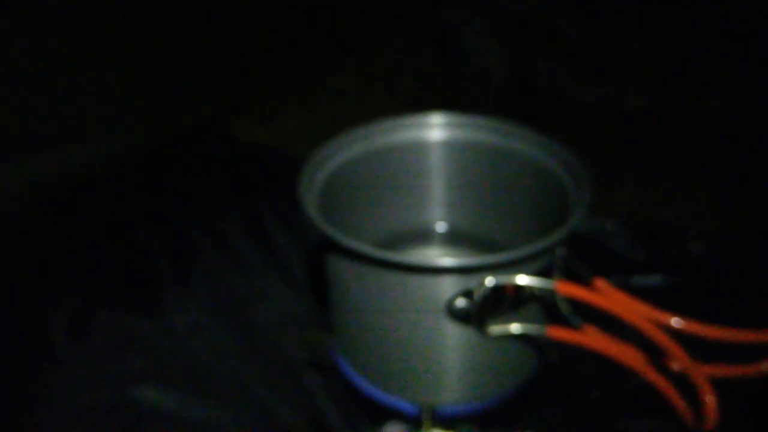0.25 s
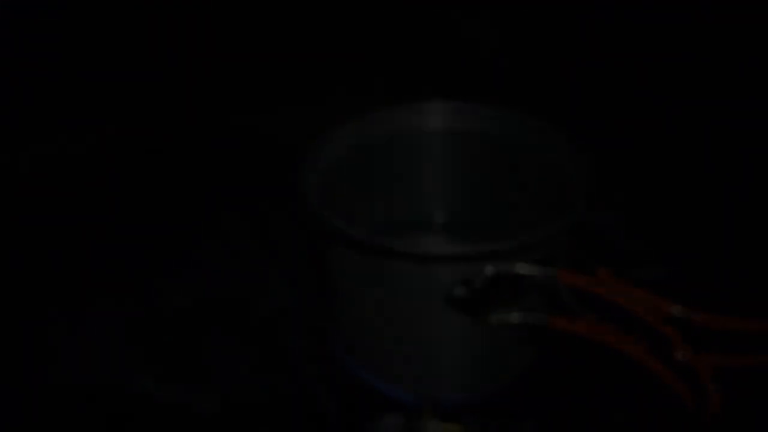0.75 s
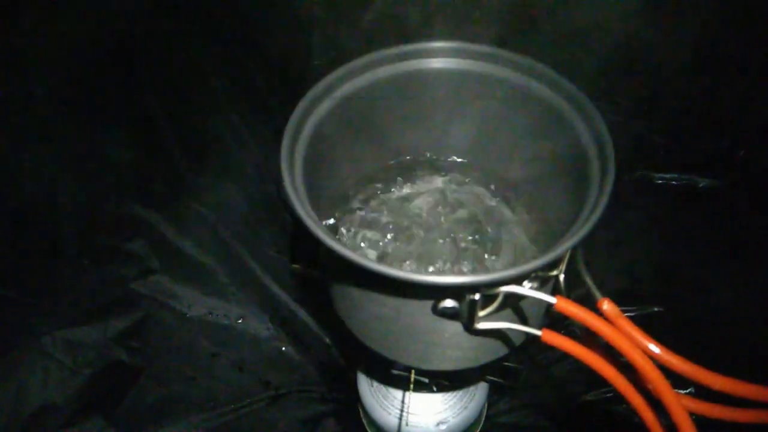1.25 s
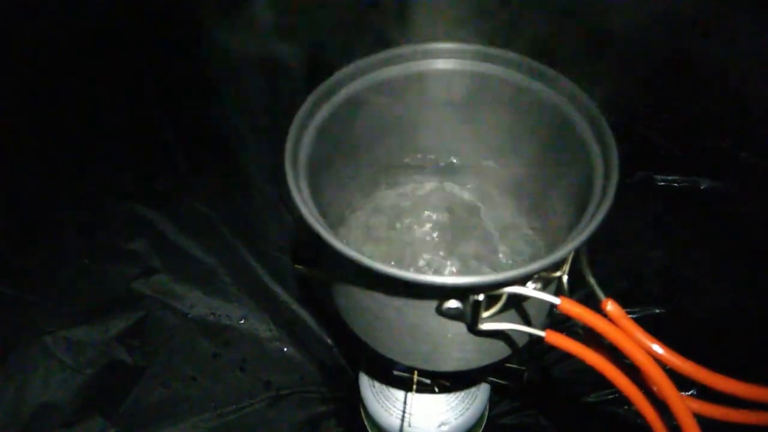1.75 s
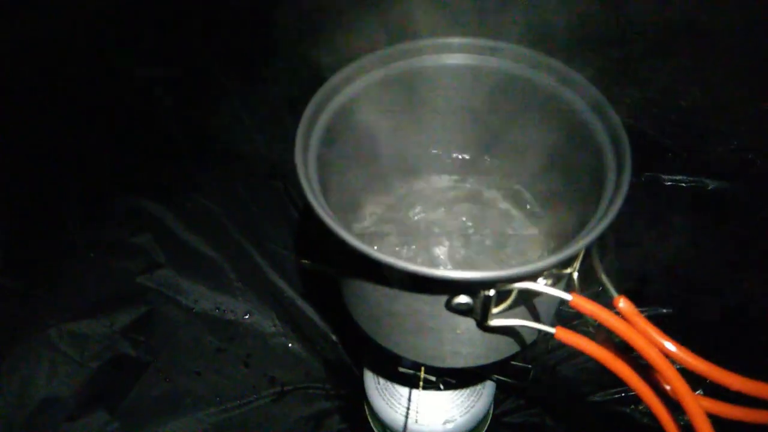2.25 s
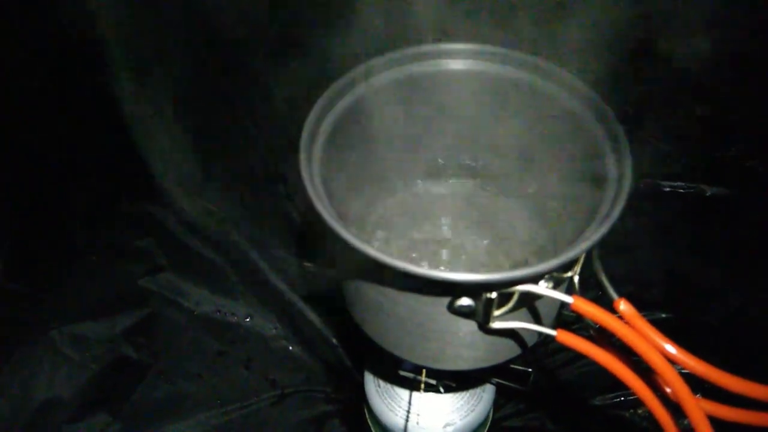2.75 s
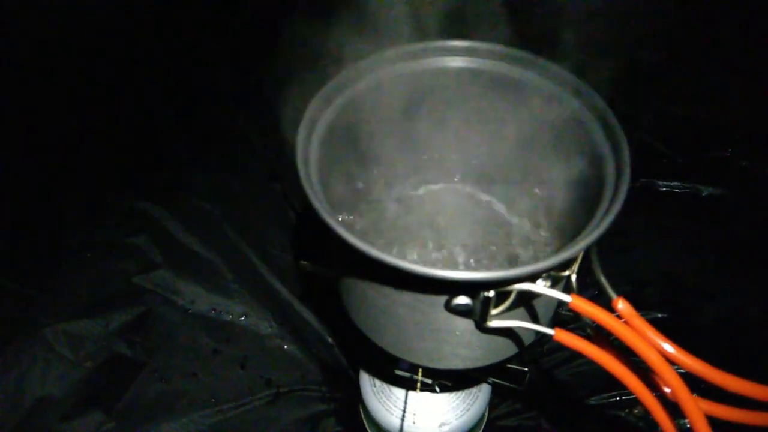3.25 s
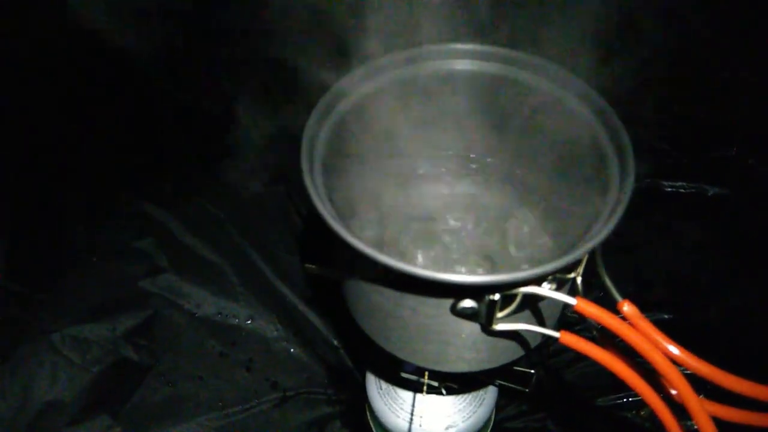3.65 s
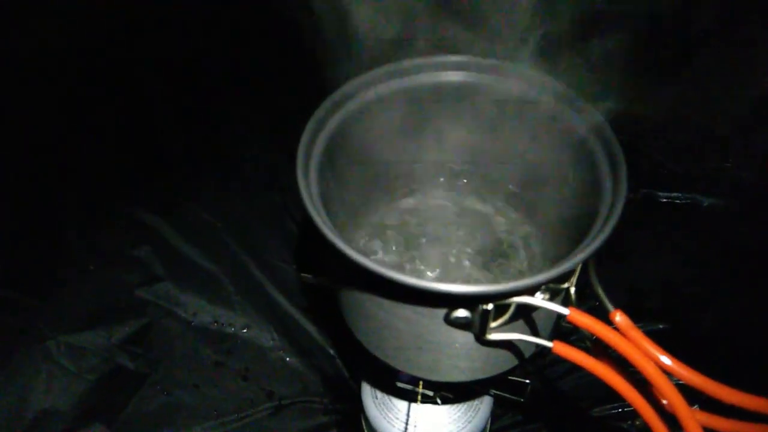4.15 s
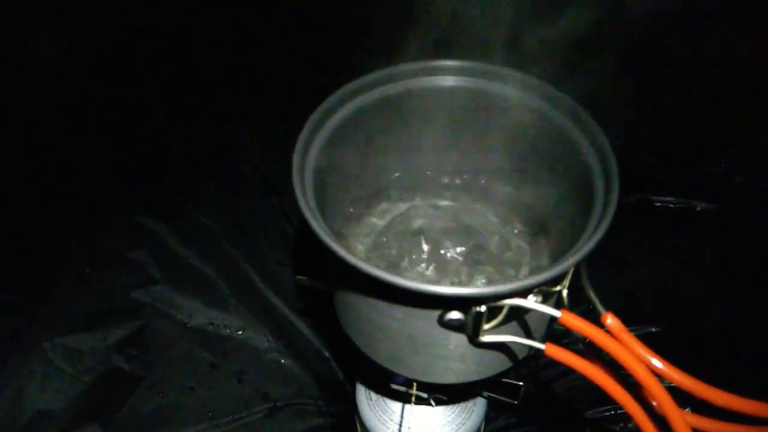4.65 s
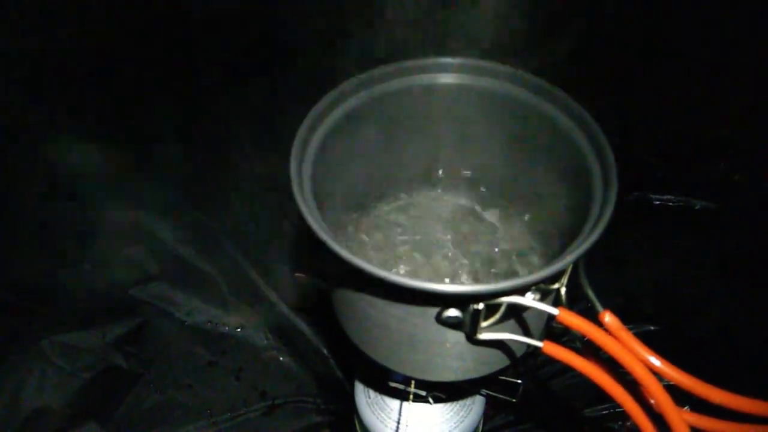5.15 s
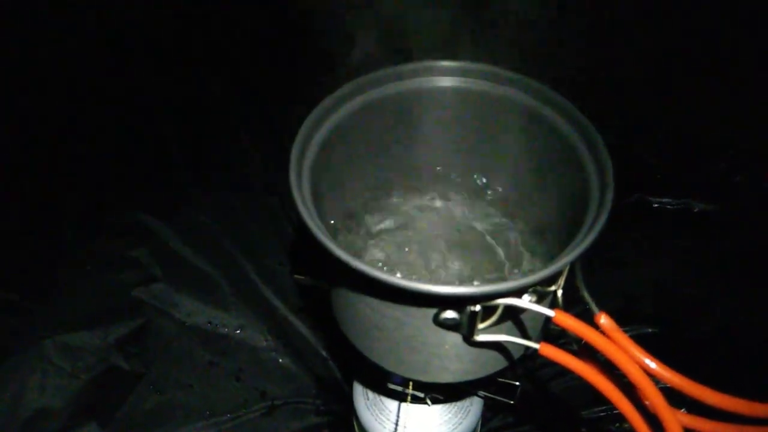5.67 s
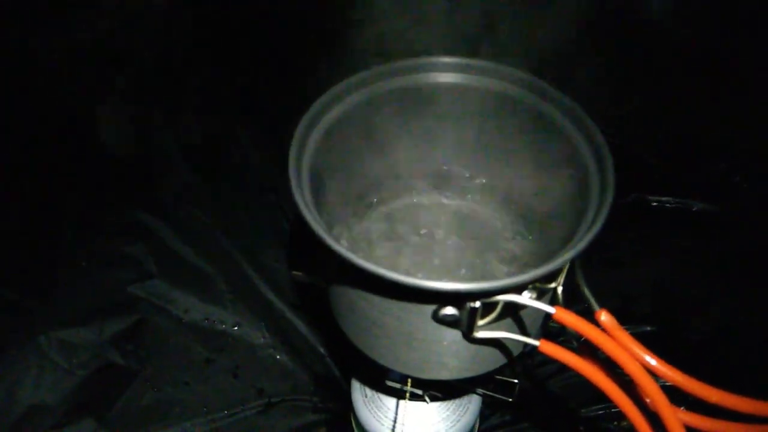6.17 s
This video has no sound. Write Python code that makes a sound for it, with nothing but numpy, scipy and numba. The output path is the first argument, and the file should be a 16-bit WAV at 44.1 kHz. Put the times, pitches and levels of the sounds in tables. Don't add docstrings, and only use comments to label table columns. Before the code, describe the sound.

Close stereo pickup of a small metal pot on a gas stove. A soft, fluttering burner roar lasts under a second, cuts abruptly to silence, then a faint thump on the left leads into a quick fade-in of rolling boil: steady hiss, dense fizz, low hollow glugs, sharp pops toward the right and tiny metallic ticks, continuing to the end.

```python
import sys
import numpy as np
from scipy import signal
from scipy.fft import rfft, irfft
from scipy.io import wavfile
from scipy.ndimage import uniform_filter1d, minimum_filter1d
from numba import njit

SR = 44100
rng = np.random.default_rng(int(sys.argv[2]) if len(sys.argv) > 2 else 0)


def field_ratio(decibels):
    return 10 ** (np.asarray(decibels, dtype=float) / 20)


def dump(signal):
    limited = np.clip(np.atleast_2d(signal).T, -1, 1)
    pcm = np.round(limited * 32767).astype(np.int16)
    wavfile.write(sys.argv[1], SR, pcm)


N = 282681

# hz, level_db_per_hz
BOIL_LEFT = [(30, -102.9), (117, -91.5), (307, -93.5), (718, -86), (851, -92.5), (953, -84), (1265, -97.5),
             (3300, -98.5), (3650, -94), (6600, -92.5), (9350, -96.5), (9950, -90.5), (13150, -87.5),
             (15550, -81.5)]
BOIL_RIGHT = [(30, -98), (307, -89), (953, -89), (1265, -93), (1900, -92.5), (3650, -81.5), (4200, -90.5),
              (5500, -82), (5850, -83.5), (6150, -77), (7050, -88), (10050, -88), (12550, -91),
              (15550, -81.5)]
# hz, width_hz, gain_db
BOIL_LEFT_MODES = [(193, 30, 2.1), (513, 62, -3.0), (1304, 91, -4.0), (1590, 111, 3.2), (2400, 168, 2.7),
                   (3180, 127, -3.5), (3750, 150, 2.6), (4590, 184, -5.8), (5010, 351, 2.6),
                   (5820, 233, -8.5), (6450, 452, 3.0), (7350, 110, 3.1), (7740, 194, -6.4),
                   (9660, 145, -2.4), (15630, 234, -2.5)]
BOIL_RIGHT_MODES = [(159, 16, 0), (279, 23, -19.5), (522, 63, -9.5), (6990, 100, -17), (7800, 140, 3),
                    (8400, 150, 0.5), (8900, 210, 4.5), (9670, 220, -2), (10050, 160, 8.5),
                    (10620, 230, -1.5), (12540, 190, 3), (13150, 190, -22), (13900, 180, -4),
                    (14500, 364, 2), (15600, 390, -9)]
# hz, width_hz, gain_db
WALL_MODES = [(282, 68, -5.5), (970, 30, 5), (3603, 220, 3.5), (3600, 170, 0.5), (6100, 30, 6),
              (6810, 80, 6)]
# hz, likeness_0_to_1
BOIL_ALIKE = [(40, 0.36), (130, 0.86), (640, 0.83), (1000, 0.88), (1400, 0.5), (2500, 0.15), (15000, 0.067)]
# time_s, level_db
BOIL_VIGOUR = [(1.13, 0.5), (1.22, 1), (1.78, .5), (2.26, 0), (3.6, 1), (3.7, 3), (3.76, 4), (3.84, 3),
               (3.92, 2), (4.42, 1), (4.73, 1.5), (4.94, 3), (5.17, 0), (5.91, 1), (6.01, 0.5),
               (6.41, -0.5)]
# start_s, peak_db, pitch_hz, decay_cycles
GLUGS = [(1.1133, -38, 1900, 0.48), (1.113, -17, 1100, 0.53), (1.1159, -41, 830, 1.2),
         (1.6152, -39, 690, 1.7), (1.7501, -33, 790, 1.2), (1.936, -33, 940, 1.7),
         (2.3252, -33.5, 890, 0.91), (2.4374, -32.5, 600, 0.82), (2.5517, -30, 1040, 0.69),
         (2.6419, -26, 1200, 0.72), (3.0868, -29, 740, 1.3), (3.7362, -23, 960, 1.1),
         (4.0194, -22, 950, 2.7), (4.1293, -31, 1030, 1.1), (4.1531, -34.5, 970, 2.9),
         (4.1881, -29.5, 970, 0.75), (4.2894, -29, 1510, 0.74), (4.7947, -28, 885, 1.6),
         (4.7977, -31, 940, 0.89), (4.8178, -29, 1040, 0.9), (4.8466, -30, 664, 1.9),
         (5.042, -32.5, 604, 0.98), (5.3695, -35.5, 920, 2.2), (5.5053, -34.5, 1090, 0.81),
         (5.5785, -35, 1030, 2.3), (5.8214, -45, 1700, 0.8), (5.8321, -39, 1700, 0.91),
         (5.892, -41, 736, 1.7), (6.1377, -27, 670, 0.81), (6.139, -35, 970, 1.6)]
# start_s, peak_db, pitch_hz
BLIPS = [(1.212, -43, 700), (1.5599, -36.5, 900), (1.906, -38, 1060), (2.7202, -39.5, 1070),
         (2.906, -44, 970), (3.069, -41, 1560), (3.0872, -46, 1090), (3.121, -46, 921), (3.2356, -42, 1230),
         (3.298, -41, 684), (3.693, -40, 930), (3.7092, -38, 1330), (3.765, -51, 1000), (4.362, -40, 1040),
         (4.515, -42, 970), (4.698, -40, 625), (4.765, -41, 1040), (4.9917, -39, 1080), (5.11, -41, 980),
         (5.14, -38, 960), (5.2825, -37.5, 920), (5.395, -40, 920), (5.8889, -44, 657), (6.009, -42.5, 660),
         (6.05, -43, 730), (6.111, -40, 885), (6.125, -39, 800), (6.15, -40, 750), (6.205, -44, 660)]
# start_s, peak_db, pitch_hz
MURMURS = [(1.013, -50, 1090), (1.08, -48, 620), (1.288, -43, 960), (1.414, -52, 767), (1.438, -53, 770),
           (1.466, -48, 665), (1.544, -44, 980), (1.599, -44, 912), (1.664, -48, 1060), (1.735, -46, 980),
           (1.775, -45, 953), (1.868, -48, 961), (1.928, -45, 890), (2.085, -49.5, 673), (2.207, -51, 738),
           (2.282, -53, 915), (2.303, -51, 991), (2.491, -44, 950), (2.53, -44, 720), (2.702, -45, 697),
           (2.863, -46, 961), (2.916, -47, 991), (3.048, -48, 921), (3.284, -50, 684), (3.324, -45, 921),
           (3.376, -48, 680), (3.444, -48, 657), (3.51, -50, 980), (3.628, -45.5, 710), (3.749, -45, 1140),
           (3.769, -52, 775), (3.928, -59, 727), (3.963, -47, 907), (3.991, -48, 1060), (4.334, -52, 918),
           (4.459, -43, 958), (4.581, -51, 690), (4.611, -50, 633), (4.625, -47, 990), (4.899, -44, 990),
           (4.923, -45, 875), (5.465, -47, 988), (5.536, -56, 883), (5.819, -46, 950), (5.831, -46, 920),
           (5.934, -44.5, 930), (5.961, -52, 807), (6.279, -47.5, 666), (6.324, -50, 620)]
# start_s, peak_db, pitch_hz, decay_cycles
POPS = [(0.993, -26, 3750, 0.56), (1.3344, -25, 2270, 0.65), (1.5037, -26, 2940, 0.8),
        (1.6536, -30.5, 2700, 3), (1.8533, -33, 2730, 1.8), (1.9302, -18, 3400, 1.26),
        (2.4515, -22.5, 2900, 0.84), (2.5384, -15.5, 3070, 0.62), (2.865, -27, 2620, 1.3),
        (2.967, -24, 2390, 0.93), (3.385, -22, 2520, 0.74), (3.4204, -22, 3270, 1.4),
        (3.5677, -26.5, 3450, 1.5), (3.7352, -34, 2860, 4.5), (3.892, -32, 2820, 3.6),
        (4.026, -19, 2750, 0.52), (4.0398, -20, 3100, 1.7), (4.1505, -24.5, 2750, 3.2),
        (4.152, -29, 3000, 1.7), (4.153, -23, 3370, 5.7), (4.52, -31, 2430, 2), (4.644, -21, 2780, 1.9),
        (4.7217, -27, 2860, 1.9), (4.738, -28.5, 2190, 1.4), (4.9014, -13.5, 3000, 0.49),
        (4.9512, -21.5, 2550, 0.72), (5.5054, -26, 2630, 0.8), (5.5377, -27, 2640, 1.7),
        (5.832, -16, 3600, 0.66), (6.3246, -24, 3060, 2.1)]
# start_s, peak_db, pitch_hz
DROPS = [(1.0663, -15, 7020), (1.0946, -30, 5370), (1.2092, -16, 6200), (1.334, -11.5, 5800),
         (1.5408, -15, 4940), (1.6654, -10.5, 6100), (1.667, -21.5, 3270), (1.7178, -30, 6100),
         (1.8527, -13, 5560), (1.8785, -26, 5440), (1.906, -11.5, 5900), (2.178, -19, 5400),
         (2.2057, -8, 12500), (2.2056, -18, 9300), (2.361, -22, 8400), (2.4725, -13, 6200),
         (2.506, -16, 7680), (2.9139, -14.5, 8400), (4.3808, -11.5, 8400), (4.904, -16, 6100),
         (5.157, -18, 7680), (5.2536, -32, 2420), (5.4182, -14.5, 8400), (5.7925, -20, 6100),
         (5.8487, -16, 3600), (5.925, -16.5, 3300), (5.9097, -16, 6100), (5.9165, -20, 5000)]
# start_s, peak_db
TICKS = [(1.0655, -44), (1.277, -35), (1.3535, -36), (1.4726, -45), (1.5395, -42), (1.5778, -40),
         (2.177, -43), (2.24, -46), (2.4294, -45), (2.6633, -35), (2.722, -45), (3.049, -45), (3.0679, -48),
         (3.1093, -43), (3.2211, -32), (3.4344, -48), (3.5114, -43), (3.5603, -38), (3.62, -46),
         (3.6666, -43), (3.6825, -35), (3.7584, -42), (3.8164, -40), (3.916, -41), (4.0063, -43),
         (4.0901, -35), (4.3323, -40), (4.3535, -44), (4.4373, -38), (4.581, -48), (4.6828, -31),
         (4.8419, -43), (5.0409, -47), (5.1223, -31), (5.2724, -43), (5.3363, -44), (5.461, -41),
         (5.5732, -43), (5.668, -49), (5.7583, -36), (5.8027, -34), (6.0317, -45), (6.106, -45),
         (6.172, -34), (6.2412, -42)]
# hz, level_db_per_hz
FLAME_LEFT = [(30, -99.5), (139, -75), (290, -84.5), (456, -74), (572, -81.5), (606, -101.5), (760, -78.5),
              (1009, -88), (1130, -101.5), (2050, -86), (3350, -99.1), (3700, -86.4), (4500, -97.5),
              (15550, -93.5)]
FLAME_RIGHT = [(30, -94), (164, -78.5), (274, -86.5), (385, -75), (511, -72), (678, -88), (1550, -89.5),
               (1750, -81), (3200, -93.5), (3850, -84), (4500, -93.5), (8750, -101.9), (9700, -96.5),
               (15550, -97)]
# hz, width_hz, gain_db
FLAME_LEFT_MODES = [(1134, 45, -1), (1580, 110, 7), (1770, 100, -8.5), (1910, 54, 6.5), (2440, 200, -18),
                    (2740, 60, 11), (3000, 76, 1), (3210, 80, 3), (4100, 81, 3), (4410, 176, 0.5),
                    (5300, 79, -13), (5480, 74, 11), (6780, 102, 3), (7200, 460, 6), (8200, 200, -6),
                    (5900, 130, -5), (9600, 1105, -4), (9900, 254, -7), (10900, 150, 8.5), (12500, 189, -4),
                    (15400, 234, 6)]
FLAME_RIGHT_MODES = [(745, 52, -1), (970, 135, 8.5), (1220, 50, -3.5), (1510, 27, -15), (2285, 67, 7),
                     (2590, 62, -4), (2860, 58, -6), (3060, 58, 6.5), (3140, 80, -15), (3400, 86, 8.5),
                     (5160, 140, -3.5), (5450, 84, 3), (7240, 107, 3), (7390, 130, -9), (7950, 130, 6),
                     (8440, 125, -6), (9800, 148, 3), (9900, 153, 5.5), (10600, 165, -1), (11640, 890, -5),
                     (13300, 400, 4)]
# hz, likeness_0_to_1
FLAME_ALIKE = [(60, 0.97), (300, 1), (700, 0.97), (1400, 0.35), (3500, 0.7), (7000, 0), (15000, 0)]
# time_s, level_db
FLAME_FLUTTER = [
    (0.0, -52.5),
    (0.36, -52),
    (0.384, -53),
    (0.408, -53),
    (0.564, -53.5),
    (0.604, -51),
    (0.642, -53.5),
    (0.76, -51.5),
]

FLAME_STOP_S, BOIL_START_S, BOIL_FULL_S = 0.767, 0.8945, 0.99
BURST_LAG_S = 0.001


def colour(points, modes):
    hz = np.arange(4097) * SR / 8192 + 1
    points_hz, points_db = np.transpose(points)
    db = np.interp(np.log(hz), np.log(points_hz), points_db)
    for mode_hz, width_hz, gain_db in modes:
        db = db + gain_db / (1 + (2 * (hz - mode_hz) / width_hz) ** 2)
    cepstrum = irfft(np.log(field_ratio(db) * np.sqrt(SR / 2)))
    cepstrum[1:4096] *= 2
    cepstrum[4097:] = 0
    return irfft(np.exp(rfft(cepstrum)))[:4096]


def through(x, response):
    return signal.fftconvolve(x, response)[:N]


def curve(table):
    time_s, level_db = np.transpose(table)
    return field_ratio(np.interp(np.arange(N) / SR, time_s, level_db - level_db.mean()))


def walk(rate_hz):
    hold = int(SR / rate_hz)
    steps = np.repeat(rng.standard_normal(N // 200), hold)[:N]
    return 1.3 * uniform_filter1d(uniform_filter1d(steps, hold), hold)


@njit
def grains(at, hz, cycles, size, glide):
    out = np.zeros(N)
    for k in range(len(at)):
        step = 2 * np.pi * hz[k] / SR
        fall = np.exp(-hz[k] / SR / cycles[k])
        phase, env, rise = 0., size[k], 1.
        i = at[k]
        while abs(env) > abs(size[k]) * .003 and i < N:
            out[i] += env * (1 - rise) * np.sin(phase)
            phase += step
            step *= 1 + glide * hz[k] / SR
            env *= fall
            rise *= np.exp(-3 * hz[k] / SR)
            i += 1
    return out


def turbulence(alike, shared_db, own_db, own_rate_hz, trend):
    hz = np.arange(N // 2 + 1) * SR / N + 1
    alike_hz, likeness = np.transpose(alike)
    share = np.clip(np.interp(np.log(hz), np.log(alike_hz), likeness), 0, 1)
    mid, side = rfft(rng.standard_normal((2, N)))
    sign = np.array([[1], [-1]])
    pair = (np.sqrt(1 + share) * mid + sign * np.sqrt(1 - share) * side) / np.sqrt(2)
    shared = shared_db * walk(110)
    out = 0
    for octave in np.arange(5, 14.6, .5):
        band = np.clip(1 - 2 * abs(np.log2(hz) - octave), 0, 1)
        gain = trend(2 ** octave) * field_ratio(shared + own_db * walk(own_rate_hz))
        out = out + gain * irfft(pair * band, N)
    return out


def fizz(low_hz, high_hz, spread_db, cycles, count):
    when, pitch, strength = rng.random((count, 3)).T
    hz = low_hz * (high_hz / low_hz) ** pitch
    size = hz * field_ratio(-spread_db * np.log(.02 + .98 * strength))
    out = grains((when * N).astype(int), hz, np.full(count, 1. * cycles), size, 0.062)
    return out / out.std()


def boil():
    vigour = curve(BOIL_VIGOUR)
    churn, spray = vigour ** 0.88, vigour ** 0.25

    def trend(hz):
        if hz < 2200:
            return churn
        return spray if hz < 8500 else 1

    hiss = field_ratio(-1.0) * turbulence(BOIL_ALIKE, shared_db=0.88, own_db=0.8, own_rate_hz=45, trend=trend)
    surge = field_ratio(2.0 * walk(60))
    large = field_ratio(-14.0) * churn * fizz(449, 1870, spread_db=1.3, cycles=2.06, count=1500)
    small_left = field_ratio(-9.0) * spray * fizz(1200, 9040, spread_db=0.51, cycles=5.0, count=6000)
    small_right = field_ratio(-8.5) * spray * fizz(1577, 5960, spread_db=3.0, cycles=1.6, count=6000)
    left = hiss[0] + surge * (large + small_left)
    right = hiss[1] + surge * (large + small_right)
    return np.array([through(left, colour(BOIL_LEFT, BOIL_LEFT_MODES)),
                     through(right, colour(BOIL_RIGHT, BOIL_RIGHT_MODES + WALL_MODES))])


def bursts(table, left_db, right_db, tail_db, tail_s, cut_hz):
    start_s, peak_db, hz, cycles = np.transpose(table)
    direct = grains((start_s * SR).astype(int), hz, np.clip(cycles, .4, 9), -field_ratio(peak_db), 0.)
    direct = signal.sosfilt(signal.butter(2, cut_hz, "high", fs=SR, output="sos"), direct)
    direct = signal.lfilter(*signal.butter(1, 9000, fs=SR), direct)
    t = np.arange(2048) / SR
    decay = np.exp(-t / tail_s) * (t > .0006) / np.sqrt(tail_s * SR)
    walls = field_ratio(tail_db) * rng.standard_normal((2, len(t))) * decay
    walls[:, 0] = 1
    return np.array([field_ratio(left_db) * through(direct, walls[0]), field_ratio(right_db) * through(direct, walls[1])])


def glugs():
    blip_cycles = 2.3
    rows = [tuple(row) for row in GLUGS]
    rows += [(s, db, hz, blip_cycles) for s, db, hz in BLIPS]
    rows += [(s + BURST_LAG_S, db + 3.5, hz, blip_cycles) for s, db, hz in MURMURS]
    return bursts(rows, left_db=-1.0, right_db=-1.0, tail_db=-5, tail_s=0.0079, cut_hz=390)


def pops():
    drop_db, drop_cycles = -9, 1.2
    rows = [tuple(row) for row in POPS]
    rows += [(s, db + drop_db, hz, drop_cycles) for s, db, hz in DROPS]
    return bursts(rows, left_db=-15, right_db=1.0, tail_db=3, tail_s=0.004, cut_hz=1900)


def cracks():
    pop_db, drop_db, tick_db = -16.5, -14, 8
    rows = [(s, db + pop_db) for s, db, *_ in POPS]
    rows += [(s, db + drop_db) for s, db, _ in DROPS]
    rows += [(s + BURST_LAG_S, db + tick_db) for s, db in TICKS]
    start_s, peak_db = np.transpose(rows)
    knock = -np.bincount((start_s * SR).astype(int), field_ratio(peak_db), N)
    wall = np.array([field_ratio(-11.5) * colour(BOIL_LEFT, BOIL_LEFT_MODES),
                     colour(BOIL_RIGHT, BOIL_RIGHT_MODES + WALL_MODES)])
    wall = signal.sosfilt(signal.butter(2, 7500, fs=SR, output="sos"), wall)
    return np.array([through(knock, side / abs(wall[1]).max()) for side in wall])


def froth():
    peak_s, rise_s, fall_s = 3.74, 0.04, 0.15
    t = np.arange(N) / SR - peak_s
    swell = np.exp(np.where(t < 0, t / rise_s, -t / fall_s))
    return field_ratio(-57) * swell * fizz(1056, 2100, spread_db=1.5, cycles=4.0, count=4000)


def flame():
    flutter = curve(FLAME_FLUTTER)

    def trend(hz):
        return flutter if hz < 3000 else 1

    roar = turbulence(FLAME_ALIKE, shared_db=0.5, own_db=1.0, own_rate_hz=29.0, trend=trend)
    return np.array([through(roar[0], colour(FLAME_LEFT, FLAME_LEFT_MODES)),
                     through(roar[1], colour(FLAME_RIGHT, FLAME_RIGHT_MODES))])


def scene():
    t = np.arange(N) / SR
    progress = (t - BOIL_START_S) / (BOIL_FULL_S - BOIL_START_S)
    fade = np.clip(0.048 + 0.41 * progress, 0, 1) ** 1.19 * (t > BOIL_START_S)
    lead_in = field_ratio(-38.5 - 650 * abs(t - BOIL_START_S)) * (t > .86)
    fade = np.maximum(fade, lead_in)
    pot = fade * boil() + glugs() + pops() + cracks()
    pot[1] = np.roll(pot[1], shift=2)
    return flame() * (t < FLAME_STOP_S) + pot + froth()


def starve(x, floor_db, masked_db, low_hz):
    hz, _, z = signal.stft(x, SR, "cosine", 2048, 1024, scaling="psd")
    power = uniform_filter1d(uniform_filter1d(2 * abs(z) ** 2, size=6, axis=1), size=2, axis=2)
    around = uniform_filter1d(power, size=70, axis=1)
    loud = power > field_ratio(2 * floor_db)
    prominent = power > field_ratio(2 * masked_db) * around
    keep = loud | prominent | (hz[:, None] < low_hz)
    keep = minimum_filter1d(keep, size=5, axis=1)
    return signal.istft(z * keep, SR, "cosine", 2048, 1024, scaling="psd")[1][:, :N]


def switch_on():
    t = np.clip(np.arange(N) / SR - BOIL_START_S, 0, None)
    ring = np.exp(-t / 0.0017) * np.cos(2 * np.pi * 150 * t + .3)
    thump = field_ratio(-39.5) * (1 - np.exp(-t / .00006)) * ring
    sway = field_ratio(-54) * np.exp(-t / 0.017) * np.sin(-2 * np.pi * 60 * t)
    return thump + sway


def band_limit(x):
    return signal.sosfilt(signal.butter(12, 15870, fs=SR, output="sos"), x)


def record(dry):
    gap_middle_s = (FLAME_STOP_S + BOIL_FULL_S) / 2
    near_gap = abs(np.arange(N) / SR - gap_middle_s) < .65 * (BOIL_FULL_S - FLAME_STOP_S)
    mix = np.where(near_gap, dry, starve(dry, floor_db=-96.5, masked_db=-4, low_hz=2000))
    mix = mix + np.array([[1], [0]]) * switch_on()
    top_cut = signal.ellip(16, .3, 70, 15740, fs=SR, output="sos")
    mix = signal.sosfilt(top_cut, mix)
    return band_limit(mix)


dry = scene()
out = record(dry)
dump(out)
```